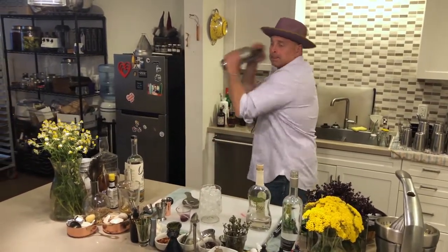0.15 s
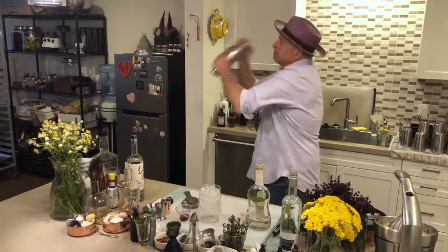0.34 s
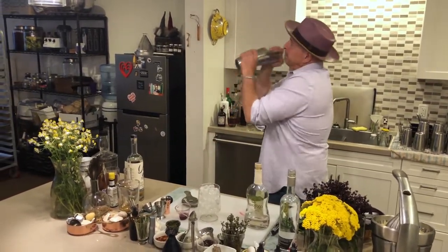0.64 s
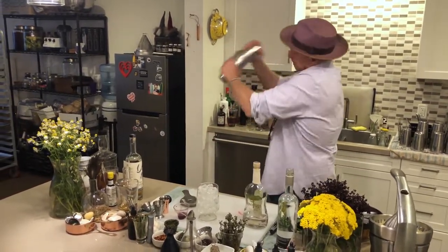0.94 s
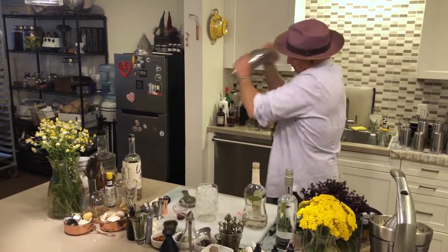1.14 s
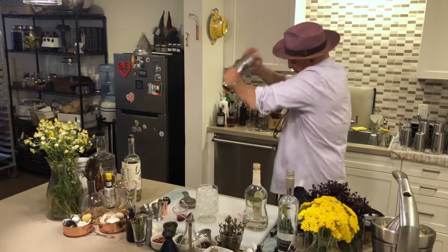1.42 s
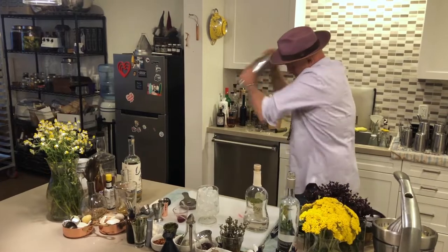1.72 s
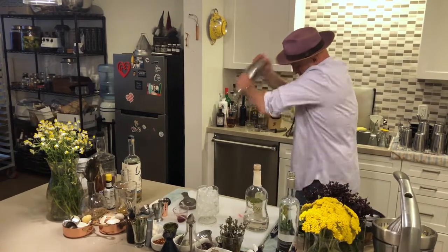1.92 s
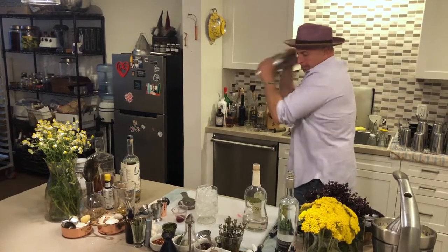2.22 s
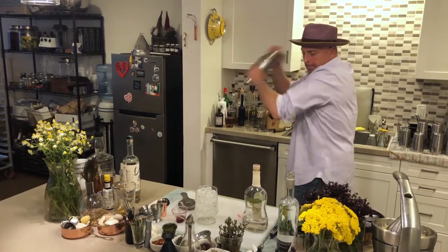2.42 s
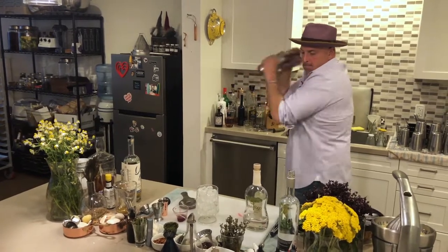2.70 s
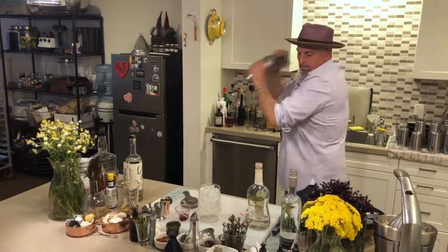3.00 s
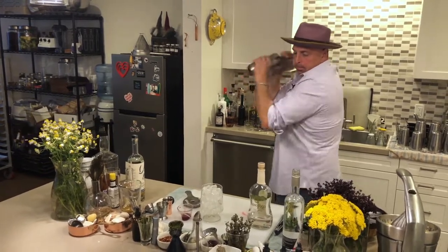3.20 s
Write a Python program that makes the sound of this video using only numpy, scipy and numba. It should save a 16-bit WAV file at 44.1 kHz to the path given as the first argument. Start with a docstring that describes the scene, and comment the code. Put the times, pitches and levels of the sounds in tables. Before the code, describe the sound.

Vigorous, steady shaking throws ice cubes back and forth in a metal shaker, knocking and clacking in a slightly echoing kitchen. Underneath, a body-worn microphone catches clothing rumble, low pulses from the arm swings and, later, a few soft thumps.

```python
"""Ice cubes rattle in a steel shaker thrown back and forth about four times a second in a kitchen.
From the start, ice piles up at each end of the throw in dull knocks, sharp clacks and fine ticks.
The steel rings briefly, clothes and room rumble, and single hard blows stand out in a short echo.
From 0.2 s, a microphone worn on the chest takes a low lurch of pressure from each swing of the arms.
From 1.3 s it also gets a few soft bumps, while the shaking goes on to the end."""
import sys
import numpy as np
from scipy import signal
from scipy.fft import rfft, irfft
from scipy.io import wavfile
from scipy.ndimage import uniform_filter1d
from numba import njit

SR = 44100
rng = np.random.default_rng(int(sys.argv[2]) if len(sys.argv) > 2 else 0)


def waveform_to_disk(signal):
    """Save audio, clipped to [-1, 1], as 16-bit WAV at the path in sys.argv[1]."""
    frames = np.transpose(np.atleast_2d(signal))
    scaled = np.clip(frames, -1, 1) * 32767
    samples = np.round(scaled).astype(np.int16)
    wavfile.write(sys.argv[1], SR, samples)


N = 147735

# the ice arrives at one end (time [s], knock level [dB], clack level [dB], tick level [dB])
STROKES = [(0.018, -43.5, -35, -45.5), (0.137, -37, -31.5, -43.5), (0.252, -39.5, -36.5, -43.5),
           (0.374, -36.5, -35, -41), (0.48, -45, -39.5, -43.5), (0.6, -36.5, -37.5, -44),
           (0.697, -36.5, -34.5, -39), (0.833, -35, -35, -41.5), (0.927, -64, -37.5, -41.5),
           (1.04, -34, -36.5, -49), (1.132, -37.5, -35, -37), (1.25, -36.5, -37.5, -46),
           (1.369, -43, -38.5, -42), (1.45, -40.5, -40.5, -53), (1.523, -38.5, -35, -50.5),
           (1.627, -41, -37, -40), (1.74, -35, -33.5, -42.5), (1.852, -40.5, -38.5, -43),
           (1.974, -35, -33, -40), (2.086, -37.5, -34, -39), (2.21, -33, -32, -39),
           (2.323, -40, -34.5, -39), (2.444, -32, -31.5, -43), (2.558, -37.5, -33.5, -45),
           (2.685, -32, -29.5, -42), (2.778, -37, -32.5, -43.5), (2.922, -33.5, -32, -43),
           (3.031, -35, -32, -44.5), (3.144, -40, -33.5, -46), (3.278, -35, -39.5, -44),
           (3.345, -40, -46, -63)]
# the two notes of the steel wall, damped by the hands (pitch [Hz], time to fade by 60 dB [s])
WALL_NOTES = [(1766, 0.097), (2035, 0.13)]
# blows that ring the lower wall note (time [s], level [dB])
LOW_RINGS = [(0.086, -32), (0.124, -28), (0.254, -23), (0.351, -26), (0.359, -21), (0.369, -18),
             (0.387, -22), (0.519, -32), (0.557, -29), (0.589, -25), (0.602, -17), (0.636, -31),
             (0.685, -29), (0.827, -26), (0.84, -23), (1.032, -16), (1.076, -32), (1.517, -19),
             (1.526, -20), (1.708, -31), (1.735, -21), (1.759, -27), (1.775, -32), (1.939, -30),
             (1.98, -23), (2.181, -27), (2.195, -25), (2.303, -32), (2.328, -30), (2.403, -29),
             (2.438, -19), (2.448, -22), (2.477, -32), (2.658, -24), (2.672, -16), (2.702, -25),
             (2.725, -31), (2.91, -31), (2.922, -24), (3.044, -31), (3.144, -25), (3.274, -33)]
# blows that ring the higher wall note (time [s], level [dB])
HIGH_RINGS = [(0.248, -37), (0.257, -32), (0.473, -26), (1.03, -29), (1.131, -34), (1.141, -31),
              (1.983, -30), (2.086, -29), (2.099, -30), (2.138, -33), (2.332, -27), (3.145, -29),
              (3.275, -33), (3.291, -32)]
# the tone of the rumble from clothes and room (frequency [Hz], relative level [dB])
RUMBLE_SHAPE = [(4, 5), (12, 12.5), (25, 1), (50, -5), (110, -15), (190, -19.5), (340, -20.5), (600, -51.5)]
# the hardest blows of single cubes
# (time [s], knock level [dB], knock pitch [Hz], clack level [dB], clack pitch [Hz], tick level [dB])
CUBE_BLOWS = [(0.0071, -22, 600, -25, 2800, -31), (0.0544, -19, 650, -26, 4700, -29),
              (0.1279, -25, 990, -19, 5100, -24), (0.1318, -22, 840, -17, 4200, -32),
              (0.1413, -18, 800, -14, 5000, -21), (0.2282, -35, 1190, -18, 5200, -18),
              (0.2319, -30, 1380, -15, 5100, -20), (0.2536, -20, 1090, -24, 4900, -28),
              (0.2651, -26, 880, -18, 4400, -26), (0.3482, -31, 1000, -19, 3600, -36),
              (0.3702, -27, 1520, -14, 3300, -22), (0.3802, -18, 1030, -17, 4300, -26),
              (0.3875, -20, 950, -17, 3000, -30), (0.4154, -32, 560, -24, 5600, -21),
              (0.459, -33, 1410, -28, 6100, -18), (0.5127, -17, 740, -27, 3400, -36),
              (0.5326, -20, 720, -27, 4100, -37), (0.592, -29, 1260, -18, 3700, -37),
              (0.6001, -23, 1100, -7, 4400, -16), (0.6049, -21, 1510, -19, 2800, -26),
              (0.6098, -25, 1530, -14, 3100, -22), (0.6654, -33, 730, -29, 5200, -19),
              (0.683, -21, 1140, -25, 3800, -28), (0.6973, -30, 820, -21, 4900, -20),
              (0.7081, -29, 1390, -21, 3200, -24), (0.717, -27, 940, -23, 5100, -17),
              (0.8297, -28, 1290, -17, 3000, -30), (0.8862, -36, 680, -20, 3700, -25),
              (0.9291, -29, 1040, -20, 3300, -25), (0.9461, -41, 1180, -22, 3800, -24),
              (1.0112, -22, 960, -26, 4200, -35), (1.0171, -29, 890, -18, 3600, -29),
              (1.0318, -18, 1430, -13, 3800, -27), (1.0536, -16, 870, -16, 2800, -32),
              (1.1189, -19, 1100, -19, 3500, -20), (1.1332, -20, 990, -24, 2500, -29),
              (1.2064, -32, 840, -22, 3100, -31), (1.2431, -21, 800, -20, 3000, -34),
              (1.2468, -26, 1320, -19, 3300, -34), (1.2833, -18, 850, -23, 3400, -32),
              (1.2892, -19, 950, -28, 3200, -36), (1.3802, -22, 860, -22, 4200, -35),
              (1.4784, -19, 1140, -16, 3600, -27), (1.4921, -20, 790, -29, 4300, -41),
              (1.5182, -17, 730, -15, 2700, -33), (1.5253, -25, 1490, -19, 2900, -33),
              (1.5762, -36, 910, -19, 3700, -28), (1.6306, -27, 940, -21, 2900, -34),
              (1.6607, -22, 740, -28, 3300, -34), (1.7203, -17, 810, -29, 4000, -38),
              (1.7336, -20, 900, -24, 4000, -36), (1.7604, -19, 910, -20, 3200, -30),
              (1.7673, -21, 880, -15, 2900, -34), (1.7712, -26, 1240, -16, 3000, -34),
              (1.8056, -21, 780, -22, 4000, -20), (1.8294, -35, 610, -22, 4500, -23),
              (1.841, -21, 1310, -24, 3500, -30), (1.8711, -19, 570, -29, 4600, -32),
              (1.8865, -20, 710, -27, 4400, -30), (1.9397, -29, 1230, -18, 3700, -34),
              (1.9434, -31, 870, -24, 6500, -22), (1.9493, -24, 1120, -15, 4200, -27),
              (1.9802, -15, 980, -20, 4100, -26), (1.9915, -23, 1500, -17, 3000, -32),
              (2.0391, -32, 710, -19, 4700, -30), (2.0463, -26, 1090, -18, 3500, -31),
              (2.0841, -19, 990, -25, 2700, -29), (2.181, -25, 940, -11, 3400, -21),
              (2.2114, -21, 870, -14, 3100, -25), (2.2201, -18, 800, -21, 2900, -33),
              (2.2433, -32, 950, -18, 4400, -16), (2.3016, -31, 1240, -20, 3200, -34),
              (2.3293, -14, 970, -22, 3100, -23), (2.4383, -18, 1030, -18, 5700, -20),
              (2.4439, -12, 910, -18, 3100, -25), (2.4495, -23, 1380, -18, 3000, -26),
              (2.4662, -22, 1280, -17, 3700, -29), (2.5367, -31, 1340, -17, 5800, -26),
              (2.5488, -29, 1080, -18, 3200, -33), (2.5745, -20, 770, -28, 3100, -38),
              (2.5974, -16, 700, -27, 3900, -33), (2.6478, -21, 760, -30, 3300, -35),
              (2.6578, -20, 1190, -17, 3300, -28), (2.6727, -16, 1420, -18, 3500, -25),
              (2.6789, -22, 1190, -18, 3200, -28), (2.6927, -20, 790, -17, 3500, -22),
              (2.697, -23, 810, -15, 4600, -22), (2.7253, -25, 1270, -17, 3800, -22),
              (2.74, -29, 1280, -19, 3900, -29), (2.7696, -20, 810, -27, 3600, -34),
              (2.7795, -26, 1000, -19, 4200, -28), (2.7835, -27, 720, -20, 3700, -24),
              (2.8109, -19, 1140, -21, 2900, -35), (2.8791, -21, 1020, -27, 3100, -22),
              (2.886, -26, 810, -20, 4300, -25), (2.9221, -18, 880, -15, 2900, -24),
              (2.9433, -19, 680, -25, 4300, -32), (2.9798, -21, 1210, -19, 3800, -32),
              (3.0208, -24, 850, -18, 4300, -31), (3.0335, -25, 950, -17, 2700, -29),
              (3.0436, -12, 790, -23, 5500, -27), (3.0897, -21, 900, -27, 3100, -37),
              (3.1074, -20, 840, -26, 4000, -27), (3.1158, -17, 720, -25, 2700, -34),
              (3.1428, -10, 970, -14, 2900, -23), (3.1462, -12, 1150, -15, 3200, -27),
              (3.1624, -19, 750, -17, 3500, -30), (3.1658, -18, 770, -23, 3800, -23),
              (3.2149, -34, 1070, -21, 3900, -29), (3.2388, -25, 1300, -20, 3400, -30),
              (3.3046, -35, 1190, -21, 3900, -25), (3.3337, -27, 1220, -18, 4000, -36),
              (3.3449, -22, 960, -15, 4800, -22)]
# arm swings felt by the microphone (time [s], peak level [dB])
ARM_SWINGS = [(0.211, -29), (0.44, -24.5), (0.66, -27), (0.888, -25.5), (1.11, -29), (1.35, -21.5),
              (1.59, -24.5), (1.796, -30), (2.028, -25.5), (2.254, -22.5), (2.489, -22), (2.726, -21.5),
              (2.958, -23), (3.198, -23.5)]
# soft bumps on the microphone (time [s], peak level [dB], pitch [Hz])
BUMPS = [(1.337, -34, 87), (1.584, -45, 81), (1.87, -49, 255), (2.401, -22.5, 173), (2.597, -29, 75),
         (2.947, -35, 104)]

KNOCK, CLACK, TICK = 1, 2, 3  # kinds of contact, numbered by their column in STROKES
REST_DB = {KNOCK: -43.5, CLACK: -41.5, TICK: -53.5}  # level between strokes


def from_db(db):
    """Turn decibels into a gain to multiply by."""
    return 10 ** (np.asarray(db) / 20)


def unit_level(x):
    """Scale a signal so that its average power is 1."""
    return x / np.sqrt(np.mean(x ** 2))


def wander(per_s):
    """A curve that glides to a new random value per_s times a second; its typical size is 1."""
    hold = int(SR / per_s)
    steps = np.repeat(rng.standard_normal(20000), hold)[:N]
    return unit_level(uniform_filter1d(steps, hold))


@njit
def add_pings(size, start, phase_step, decay, gain):
    """Add up pings: each is a sine wave that swells quickly to its peak and dies away."""
    out = np.zeros(size)
    for k in range(len(start)):
        wave = gain[k] * decay[k] * np.e + 0j
        turn_and_fade = np.exp(1j * phase_step[k] - decay[k])
        first = int(start[k])
        for n in range(min(int(9 / decay[k]), size - first)):
            out[first + n] += n * wave.imag
            wave *= turn_and_fade
    return out


def pings(times, hz, gain, cycles):
    """Short pings at the given times, each lasting the given number of vibrations."""
    hz = np.clip(hz, 20, .45 * SR)
    decay = 9 * hz / (cycles * SR)
    return add_pings(N, np.clip(times * SR, 0, N - 1), 2 * np.pi * hz / SR, decay, gain)


def pile_up(kind, rise_s=.042, fall_s=.039):
    """A gain that swells above its resting level each time the ice reaches an end."""
    strokes = np.array(STROKES)
    samples = np.arange(0, N, 64)
    since = samples / SR - strokes[:, :1]
    swells = np.exp(-(since / np.where(since < 0, rise_s, fall_s)) ** 2)
    power = from_db(REST_DB[kind]) ** 2 + (from_db(strokes[:, [kind]]) ** 2 * swells).sum(axis=0)
    return np.interp(np.arange(N), samples, np.sqrt(power))


def contacts(kind, low_hz, high_hz, per_s, scatter_db, cycles):
    """Countless small touches of ice, all of one kind, uneven in timing, size and pitch."""
    gap, pitch, size, side = rng.random((40000, 4)).T
    times = np.cumsum(-np.log(1 - gap)) / per_s
    hz = low_hz * (high_hz / low_hz) ** pitch
    size_db = scatter_db * np.minimum(-np.log(1 - size), 3.5)  # many small, a few large
    gain = from_db(size_db) * np.sign(side - .5) * (times < N / SR)
    gain *= (hz / low_hz) ** .64  # higher pings swing wider
    return unit_level(pings(times, hz, gain, cycles)) * pile_up(kind)


def ice_rattle():
    """Loose cubes hit each other and the shaker in a stream of knocks, clacks and ticks."""
    knocks = contacts(KNOCK, low_hz=406, high_hz=1708, per_s=500, scatter_db=3.5, cycles=6)
    clacks = contacts(CLACK, low_hz=1469, high_hz=7433, per_s=4000, scatter_db=5, cycles=10)
    ticks = contacts(TICK, low_hz=6481, high_hz=14486, per_s=8000, scatter_db=7.5, cycles=18)
    bunch_db = 1.5 * wander(per_s=40)  # the ice tumbles in bunches
    crunch_db = 2.5 * wander(per_s=250)  # neighbours touch at once
    rattle = (knocks + clacks + ticks) * from_db(bunch_db + crunch_db)
    return signal.sosfilt(signal.butter(2, 380, "high", fs=SR, output="sos"), rattle)


def resonate(taps, hz, fade_s):
    """Each tap rings one note, which fades by 60 dB in fade_s."""
    fade, step = 1000 ** (-1 / (fade_s * SR)), 2 * np.pi * hz / SR
    return signal.lfilter([0, np.sin(step)], [1, -2 * fade * np.cos(step), fade * fade], taps)


def steel_wall(taps_per_s=560, hum_db=(-34, -46)):
    """The steel hums faintly under taps of small ice, and hard blows set it ringing anew."""
    out, t = np.zeros(N), np.arange(N) / SR
    for (hz, fade_s), rings, db in zip(WALL_NOTES, (LOW_RINGS, HIGH_RINGS), hum_db):
        taps = rng.standard_normal(N) * (rng.random(N) < taps_per_s / SR)
        taps /= np.std(resonate(taps, hz, fade_s))
        out += resonate(taps * pile_up(CLACK) * from_db(db), hz, fade_s)  # hum follows the clacks
        times, ring_db = np.array(rings).T
        latest = np.searchsorted(times, t) - 1
        swing = (latest >= 0) * from_db(ring_db[latest]) * 1000 ** (-abs(t - times[latest]) / fade_s)
        bend = 1 + .004 * wander(per_s=40)  # the grip bends the pitch a little
        out += swing * np.sin(2 * np.pi * hz / SR * np.cumsum(bend))
    return out


def rumble(start_db=-37, growth_db_per_s=1.5, flicker_db=2):
    """Clothes and room make a deep noise that flickers and slowly grows."""
    t = np.arange(N) / SR
    hz = np.maximum(np.arange(N // 2 + 1) * SR / N, 1)
    shape_hz, shape_db = np.array(RUMBLE_SHAPE).T
    tone_db = np.interp(np.log(hz), np.log(shape_hz), shape_db, left=-40, right=-90)
    noise = unit_level(irfft(rfft(rng.standard_normal(N)) * from_db(tone_db), N))
    return noise * from_db(start_db + growth_db_per_s * t + flicker_db * wander(per_s=9))


def kitchen_echo(sound, level_db=-11, fade_s=.16, delay_s=.001):
    """Tiles and cupboards throw the sound back as a short, slightly duller tail."""
    t = np.arange(SR // 2) / SR
    tail = rng.standard_normal(len(t)) * 1000 ** (-t / fade_s) * (t > delay_s)
    tail = signal.lfilter(*signal.butter(1, 14000, fs=SR), tail)
    tail /= np.sqrt(np.sum(tail ** 2))
    return signal.fftconvolve(sound, tail)[:N] * from_db(level_db)


def cube_blows(chips=6, chip_db=-11, tick_hz=10370, pitch_spread=.23, lag_s=.0008):
    """One cube hits hard: a knock, a clack and a thud from its mass, then chips that clack and tick."""
    times, knock_db, knock_hz, clack_db, clack_hz, tick_db = np.array(CUBE_BLOWS).T
    knocks = pings(times, knock_hz, from_db(knock_db), cycles=4.5)
    clacks = pings(times, clack_hz, from_db(clack_db), cycles=8)
    thuds = pings(times, .4 * knock_hz, from_db(knock_db - 18.5), cycles=3)
    out = knocks + clacks + thuds
    chip_gain = from_db(clack_db + chip_db)
    tick_gain = from_db(tick_db) / np.sqrt(chips / 2)  # spread over the chips
    for clack_shift, tick_shift, lag in rng.standard_normal((len(times), 3, chips)).T:
        late, side = times + lag_s * abs(lag), np.sign(lag)
        out += pings(late, clack_hz * np.exp(pitch_spread * clack_shift), side * chip_gain, cycles=8)
        out += pings(late, tick_hz * np.exp(pitch_spread * tick_shift), side * tick_gain, cycles=18)
    return out


def arm_lurches(width_s=.018, turn_s=1.7):
    """Each arm swing pushes air at the microphone; once the body turns, the pushes become pulls."""
    out, t = np.zeros(N), np.arange(N) / SR
    for time, db in ARM_SWINGS:
        offset = (t - time) / width_s
        pulse = (1 - offset ** 2) * np.exp(-offset ** 2 / 2)
        out += from_db(db) * np.sign(turn_s - time) * pulse
    return out


def microphone_bumps():
    """Soft bumps on the microphone make short, low thumps."""
    times, db, hz = np.array(BUMPS).T
    return pings(times, hz, from_db(db), cycles=3)


def scene():
    """The shaker and its echo, plus the low sounds at the chest, in one channel."""
    shaker = ice_rattle() + cube_blows() + steel_wall()
    return (shaker + kitchen_echo(shaker) + rumble() + arm_lurches() + microphone_bumps())[None]


def record(dry):
    """The small microphone rounds off the hardest blows, softens the treble and cuts it above 15 kHz."""
    ceiling = .45
    rounded = ceiling * np.tanh(dry / ceiling)
    softened = signal.sosfilt(signal.butter(4, 14300, fs=SR, output="sos"), rounded)
    return signal.sosfilt(signal.ellip(8, .2, 70, 15000, fs=SR, output="sos"), softened)


dry = scene()
out = record(dry)
waveform_to_disk(out)
```